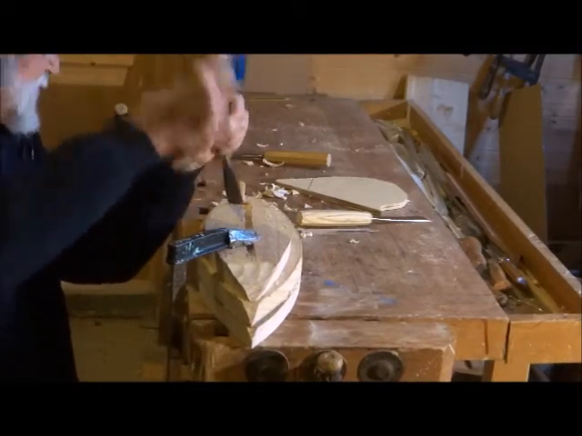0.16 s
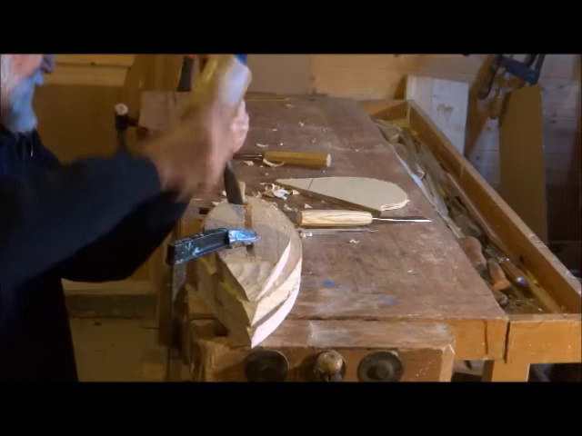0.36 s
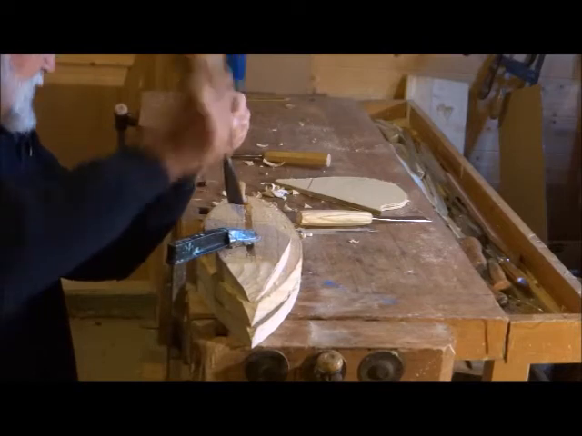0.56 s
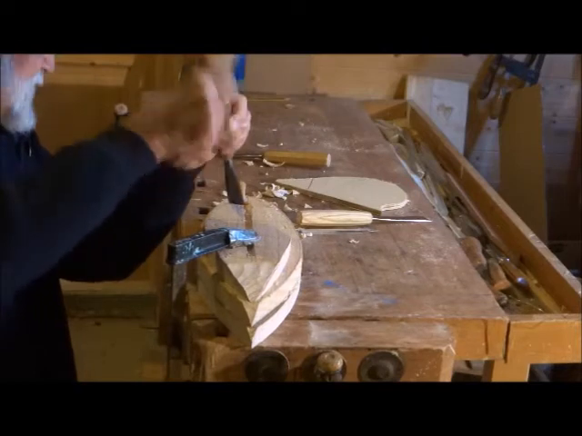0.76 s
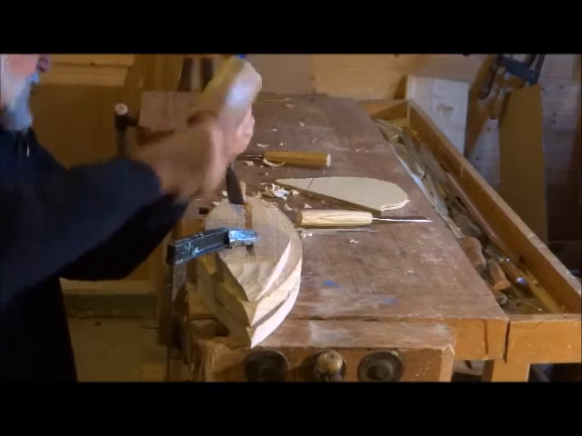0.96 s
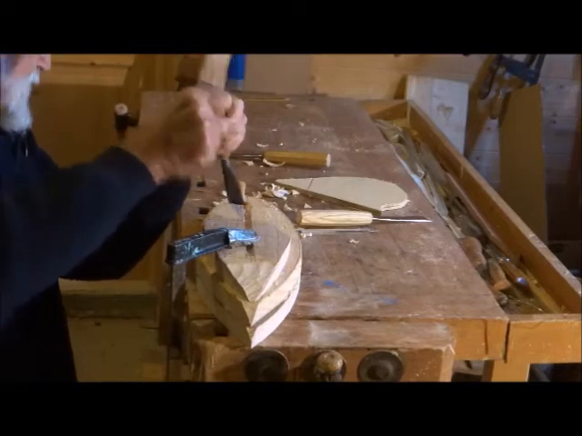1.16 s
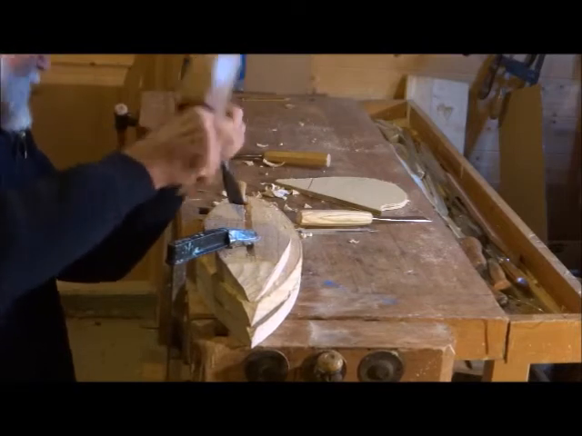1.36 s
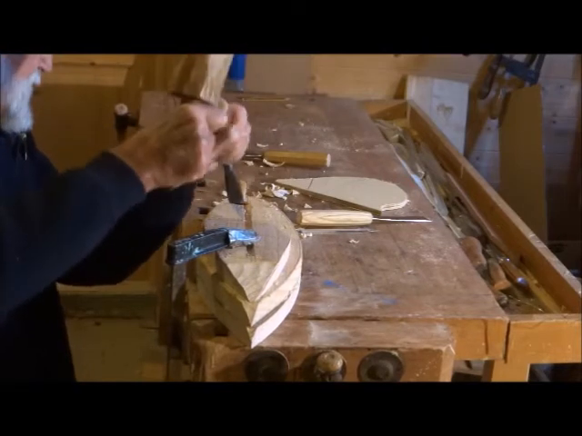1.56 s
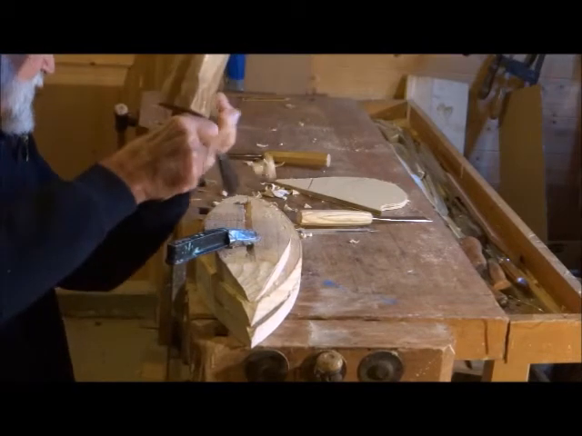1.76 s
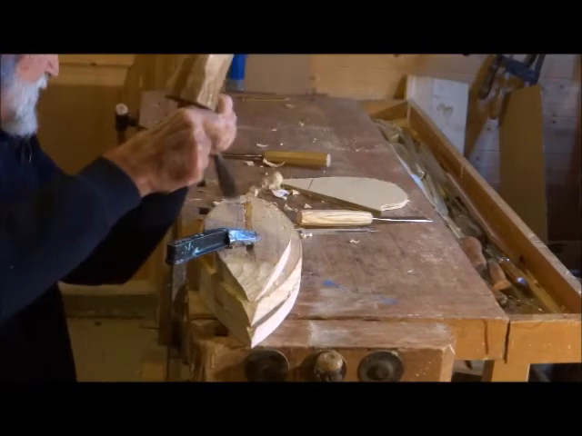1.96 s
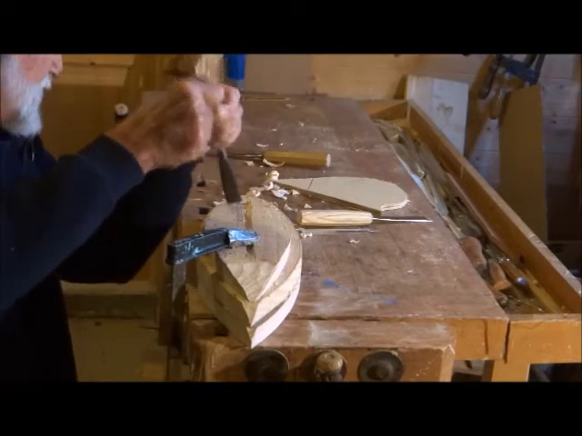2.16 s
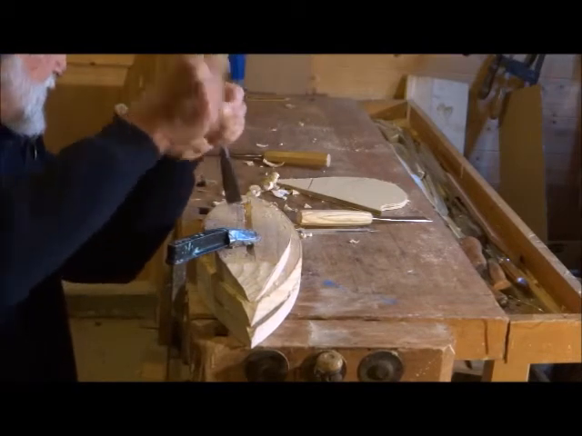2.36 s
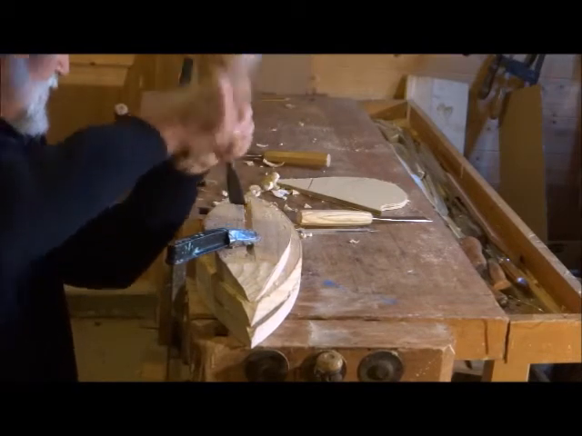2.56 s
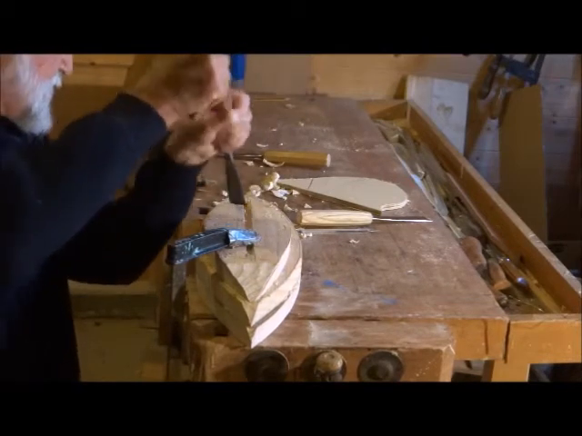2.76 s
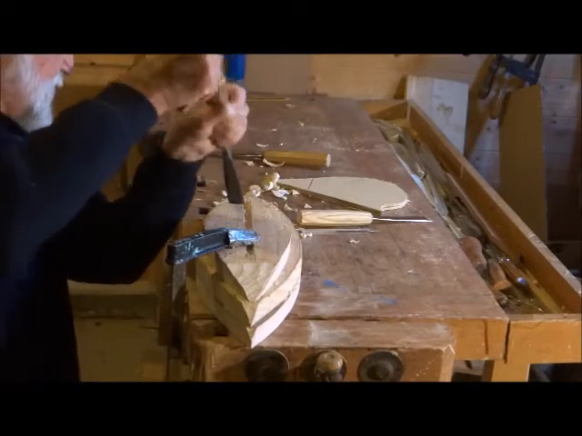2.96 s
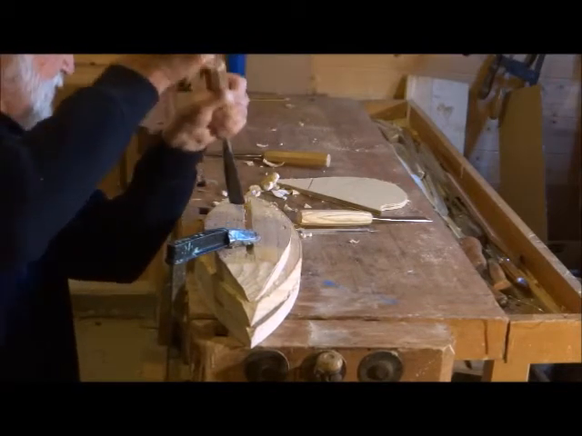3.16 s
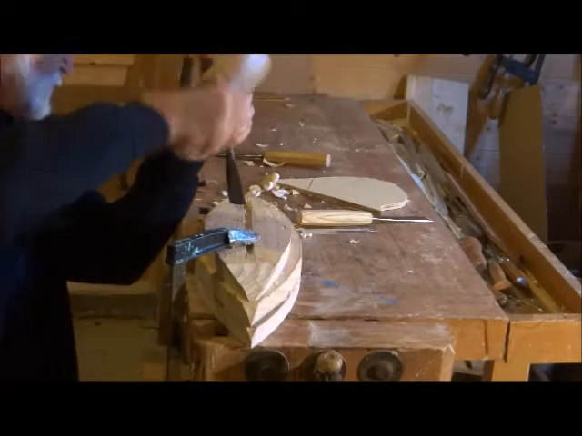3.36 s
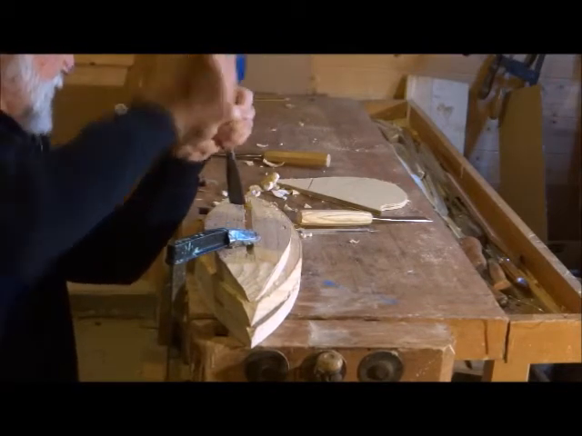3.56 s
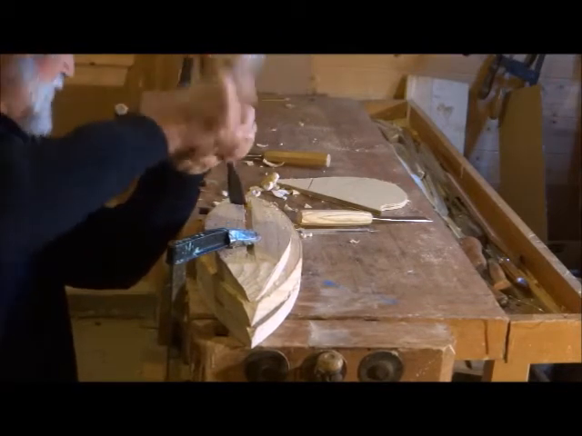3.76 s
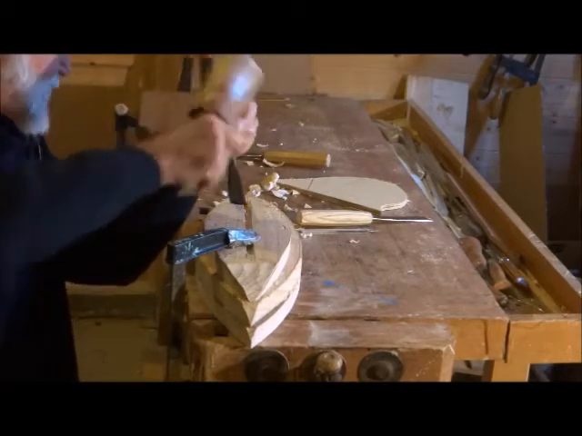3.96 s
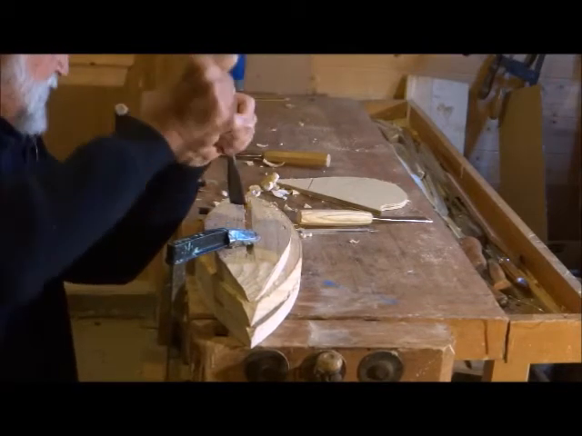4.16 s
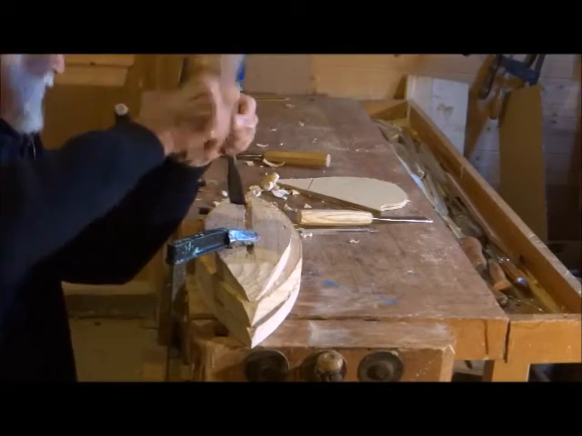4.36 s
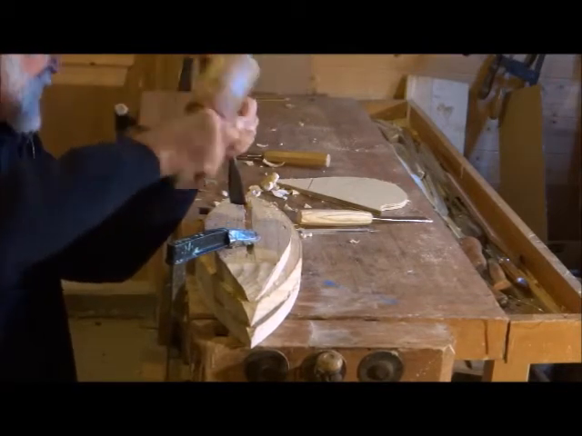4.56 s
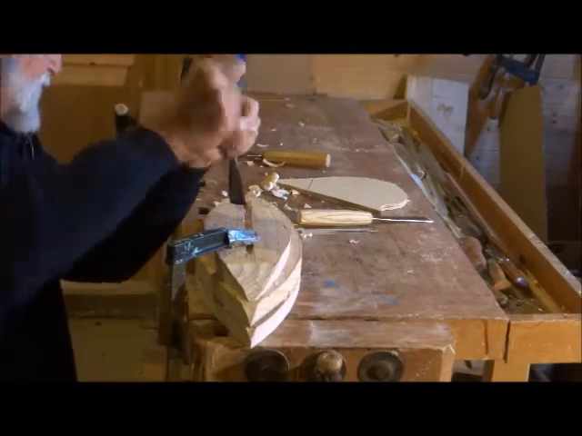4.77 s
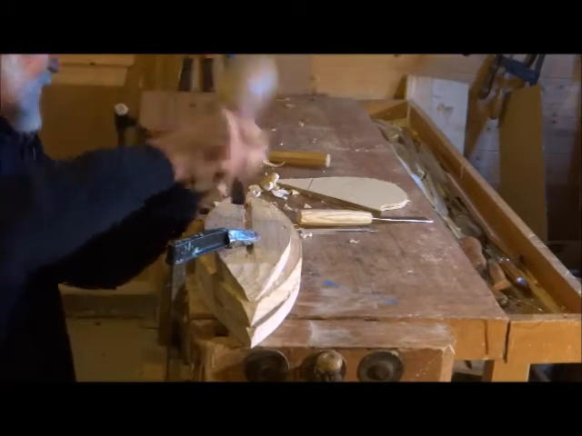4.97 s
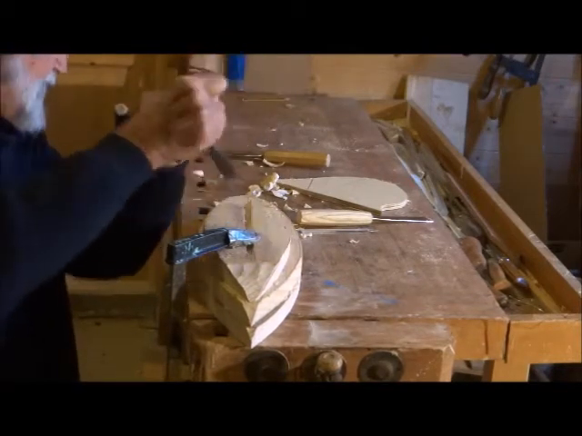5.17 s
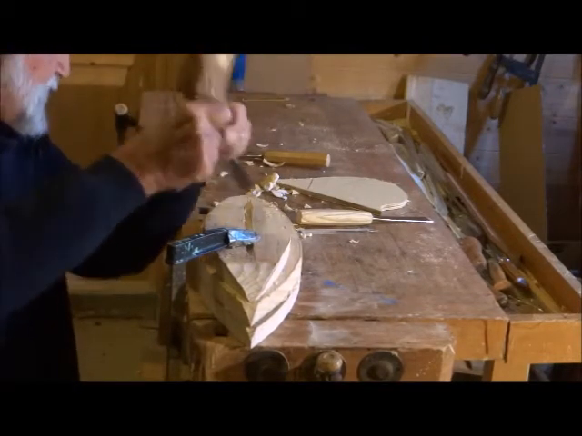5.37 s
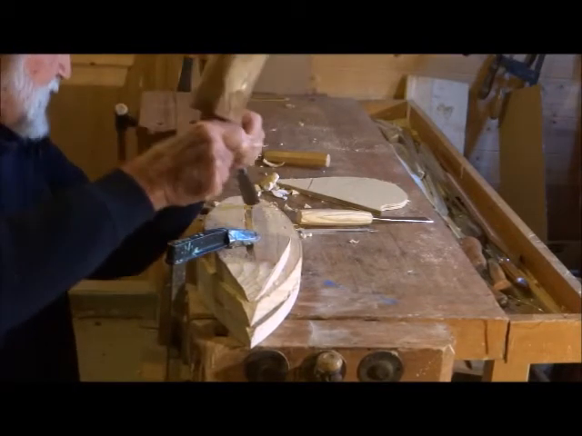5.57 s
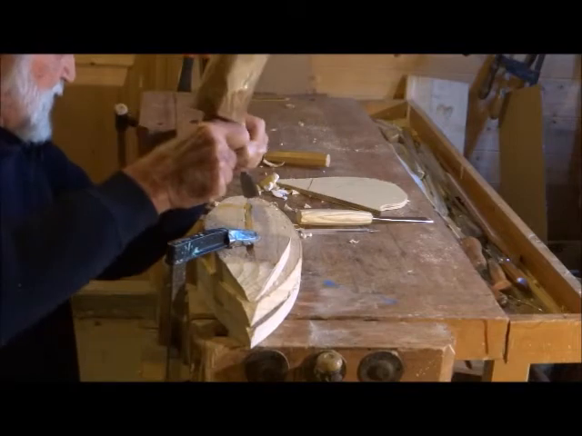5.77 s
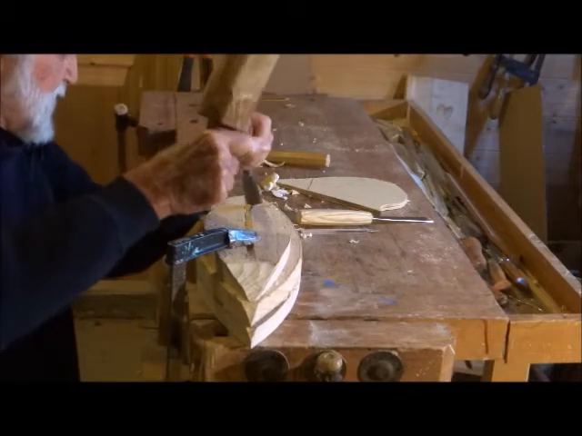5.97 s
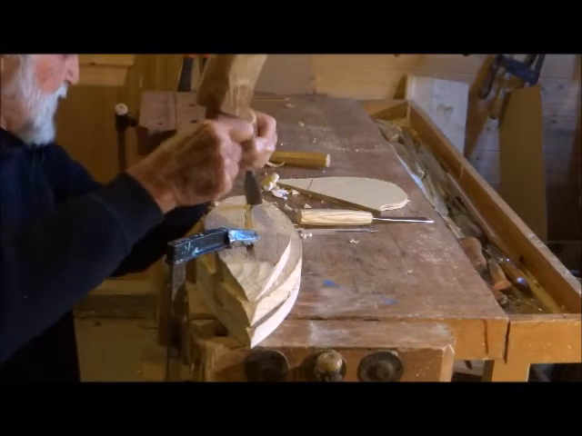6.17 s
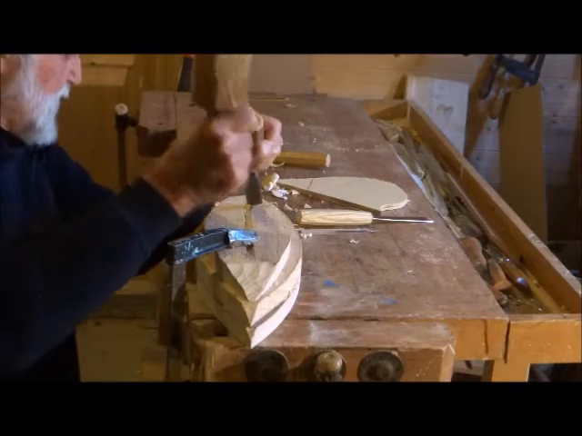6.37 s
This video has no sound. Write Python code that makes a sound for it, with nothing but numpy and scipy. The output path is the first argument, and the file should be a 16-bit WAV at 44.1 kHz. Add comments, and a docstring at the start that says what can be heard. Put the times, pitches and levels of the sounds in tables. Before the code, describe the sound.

Sharp, ringing wooden knocks of a mallet on a chisel, pausing for light bumps and the crack of levered wood.

```python
"""A wooden mallet drives a chisel into a glued block clamped on a workbench: two runs of quick blows
and a few single ones, each a short knock that sets block and bench ringing.
Between them the chisel is levered, fibres crack away and the tools bump lightly.
A small, live workshop echoes over faint room tone; a limiter flattens the start of each blow."""
import sys
import numpy as np
from scipy import signal
from scipy.fft import rfft, irfft
from scipy.io import wavfile
from scipy.ndimage import uniform_filter1d, minimum_filter1d

SR = 44100
rng = np.random.default_rng(int(sys.argv[2]) if len(sys.argv) > 2 else 0)


def bounce(signal):
    """Save signal as a 16-bit WAV file at the path given by the first command-line argument."""
    frames = np.transpose(np.atleast_2d(signal))
    limited = np.clip(frames, -1, 1)
    pcm = np.round(limited * 32767).astype(np.int16)
    wavfile.write(sys.argv[1], SR, pcm)


N = 286650
N_FFT, LEAD = 8192, SR // 20
HZ = np.fft.rfftfreq(N_FFT, 1 / SR)
TIME_S = np.arange(-LEAD, N) / SR  # work is under way at t = 0
RING_S = np.arange(SR * 3 // 4) / SR

# tool bumps on the block: t/s, level/dB
BUMPS = [(1.555, -33.5), (1.978, -21.5), (2.93, -22.5), (5.572, -37.5), (5.603, -42), (5.814, -21)]


def mallet(handle_hz=1520, handle_width_hz=260):
    """One push a blow, coloured by how squarely the mallet lands and how deep the edge sits."""
    # blows: t/s, strength/dB, thud/dB, block f/Hz, handle ring/dB, crack/dB, blade f/Hz
    blows = [(-.012, -.5, -0.5, 1270, -4, 1.5, 4300), (.295, -1, -1.5, 1350, -5, 1.5, 7600),
             (.596, -3, -0.5, 1405, -3.5, 4.5, 7750), (.907, -3, -1, 753, 3, 1.5, 4460),
             (1.227, -2, -1, 814, 0, -3, 2980), (2.414, -8, -7, 300, 8.5, -1, 5460),
             (3.295, -3, -0.5, 540, 4.5, 1.5, 2430), (3.6153, -1.5, -3, 440, 4.5, 0, 7350),
             (3.9264, 0.5, -2, 974, -0.5, -1.5, 6100), (4.231, 1, -1.5, 1046, -3, -3.5, 7700),
             (4.534, -2, -.5, 697, 0.5, 0, 4300), (4.832, -1.5, 1, 380, 4, 1.5, 3380),
             (6.45, -11, 1, 1230, 2, 0, 7000)]
    # centres of thud, knock, crack and snap: f/Hz
    bands_hz = [380, 950, 2900, 7800]
    pushes = np.zeros(len(TIME_S))
    for start_s, strength_db, thud_db, block_hz, handle_db, crack_db, blade_hz in blows:
        snap_db = 0.54 * crack_db - 1
        tilt_db = spectrum(list(zip(bands_hz, [thud_db, 0, crack_db, snap_db])))
        lift_db = bells([(block_hz, 0.3 * block_hz, 5),
                         (handle_hz, handle_width_hz, handle_db),
                         (blade_hz, 0.065 * blade_hz, 5)])
        add(pushes, start_s, through(contact(), pulse(strength_db + tilt_db + lift_db)))
    return pushes


def contact(corner_hz=3000, crush_s=0.0027, crush_db=-2):
    """A smooth push, then a splintery crush of fibres under the edge that carries the treble."""
    t = RING_S[:N_FFT]
    low_power = 1 / (1 + (HZ / corner_hz) ** 6)
    push = pulse(10 * np.log10(low_power))
    splinters = unit(spiky_noise(N_FFT, spread_db=3) * np.exp(-t / crush_s))
    crush = through(splinters, pulse(crush_db + 10 * np.log10(1 - low_power + 1e-9)))
    return whiten(push + crush, bins=31)


def chisel(pushes):
    """Short wood-on-wood knock with the hand-damped resonances of handle and blade."""
    # knock of mallet, chisel and block: f/Hz, level/dB
    knock = [(25, -36), (60, -38), (90, -24), (140, -19), (200, -13.5), (280, -4), (750, -3), (1150, -3),
             (1750, -3.5), (2500, -4), (3200, -10), (6800, -20), (9300, -20.5), (11000, -34.5)]
    # hand-held chisel: f/Hz, width/Hz, lift/dB
    resonances = [(1568, 140, 5), (4300, 230, 4), (5450, 140, 4.5), (6350, 45, 6), (7950, 750, 5.5)]
    return through(pushes, unit(pulse(spectrum(knock) + bells(resonances))))


def bench(pushes, build_cycles=4.1):
    """Modes take a few cycles to build, so the low ones swell after the knock."""
    # block, bench and surrounding space: f/Hz, level/dB, T60/s
    modes = [(115.5, -41, 0.23), (199.5, -27, 0.22), (260.7, -22.5, 0.3), (280.1, -19, 0.34),
             (301.6, -13, 0.32), (412, -17.5, 0.34), (428, -15.5, 0.35), (451.4, -15, .32),
             (483, -13, 0.24), (505.5, -13.5, 0.27), (566, -19.5, 0.27), (622, -17, 0.27),
             (696, -17.5, 0.25), (935, -16.5, 0.2), (1101, -18.5, 0.32), (1134, -15.5, 0.24),
             (1193, -16, 0.29), (1306, -20, 0.28), (1496, -18, .3), (1517, -19, 0.21), (1545, -15.5, .3),
             (1573, -17.5, .3), (1670, -29, 0.25), (1984, -16, 0.25), (2530, -18, 0.19)]
    t = RING_S
    ring = np.zeros(len(t))
    for hz, db, t60_s in modes:
        envelope = (1 - np.exp(-t * hz / build_cycles)) * gain_of(-60 * t / t60_s)
        ring += gain_of(db) * unit(envelope * np.sin(2 * np.pi * (hz * t + rng.random())))
    return through(pushes, ring)


def fibres(highpass_hz=200, rub_db=-11, rub_s=0.012):
    """Fibres crack under the levered chisel and rub faintly at each bump."""
    # breaks: t/s, level/dB, length/s, tilt/(dB/octave)
    cracks = [(1.555, -6.5, 0.0029, 6.5), (1.72, -32, 0.0081, 5), (1.82, -16, 0.003, 0),
              (1.93, -22.5, .02, 15), (1.975, -23.5, .014, 2), (2.592, -22.5, .007, 4),
              (2.751, -24, 0.019, 7.5), (2.928, -18.5, .03, 4), (3.046, 6.5, 0.012, 0.44),
              (4.949, -11.5, 0.012, 5), (5.117, -9, .026, -4), (6.289, -28, 0.021, -0.5)]
    rubs = [(start_s, db + rub_db, rub_s, 0) for start_s, db in BUMPS]
    out = np.zeros(len(TIME_S))
    for start_s, db, length_s, db_per_octave in [*cracks, *rubs]:
        add(out, start_s - LEAD / SR, gain_of(db) * crack(length_s, db_per_octave))
    return signal.sosfilt(signal.butter(2, highpass_hz, "high", fs=SR, output="sos"), out)


def crack(length_s, db_per_octave, strain_db=-11.5):
    """Tiny uneven snaps grow under strain; the fibres break LEAD samples in."""
    # fibre snap: f/Hz, level/dB
    colour = [(100, -33.5), (300, -14), (550, -0.5), (2200, 1), (5000, 0), (9000, -1.5), (11000, -16.5)]
    # narrow peaks colouring the fibre cracks: f/Hz, width/Hz, lift/dB
    crack_peaks = [(3360, 130, 3.5), (3710, 150, 6.5), (1100, 110, 2.5)]
    t = TIME_S[:N_FFT]
    strain = gain_of(strain_db) * np.exp(-abs(t) / length_s) * (t < length_s)
    breaking = np.sin(np.pi * np.clip(t / length_s, 0, 1))
    clump = whiten(spiky_noise(N_FFT, spread_db=7) * np.maximum(strain, breaking), bins=15)
    tilt_db = db_per_octave * np.log2(HZ / 3000 + 0.1)
    return unit(through(clump, pulse(spectrum(colour) + bells(crack_peaks) + tilt_db)))


def bumps(firm_db=-25, firm_hz=800, db_per_octave=13, highpass_hz=260):
    """Tools tap the block; the softer, the duller."""
    # tap resonances: f/Hz, width/Hz, lift/dB
    resonances = [(320, 90, 5), (1070, 230, 10)]
    highpass_db = -10 * np.log10(1 + (highpass_hz / (HZ + 1)) ** 6)
    out = np.zeros(len(TIME_S))
    for start_s, db in BUMPS:
        corner_hz = firm_hz * 2 ** ((db - firm_db) / db_per_octave)
        lowpass_db = -16 * np.log10(1 + (HZ / corner_hz) ** 3)
        add(out, start_s, gain_of(db) * unit(pulse(lowpass_db + highpass_db + bells(resonances))))
    return out


def workshop(x, sway_rad_per_s=1.886):
    """Direct sound plus echoes whose pattern shifts as the worker moves."""
    # direct path against echoes: f/Hz, level/dB
    direct = [(200, -19), (600, -23), (1400, -2.5), (2500, -5), (4500, -15), (10000, -11.5)]
    # side against mid echoes: f/Hz, level/dB
    width = [(60, -17), (250, -20), (600, -15.5), (1400, -12), (3000, -11), (9000, -9.5)]
    paths = [x * np.cos(sway_rad_per_s * TIME_S), x * np.sin(sway_rad_per_s * TIME_S)]
    mid_echoes = sum(through(path, reflections()) for path in paths)
    side_echoes = sum(through(path, reflections()) for path in paths)
    mid = through(x, pulse(spectrum(direct))) + mid_echoes
    side = through(side_echoes, pulse(spectrum(width)))
    return np.array([mid + side, mid - side])


def reflections(walls_s=0.0053, bench_top_db=-7):
    """Weak early echoes off the bench top, then walls and ceiling, decaying by band."""
    # room decay: f/Hz, T60/s
    decay = [(100, 0.47), (260, 0.28), (700, 0.31), (1800, 0.28), (4800, 0.27), (10000, 0.24)]
    hz, t, noise = signal.stft(rng.standard_normal(len(RING_S)), SR, nperseg=256)
    t60_s = np.interp(hz, HZ, spectrum(decay))[:, None]
    _, tail = signal.istft(noise * gain_of(-60 * t / t60_s), SR, nperseg=256)
    onset = np.where(RING_S > walls_s, 1, gain_of(bench_top_db))
    return whiten(tail[:len(RING_S)] * onset, bins=15)


def room_tone(mid_db=-64.5, side_re_mid_db=-6):
    """Steady faint noise, partly alike in both ears."""
    # room tone and hiss: f/Hz, level/dB
    floor = [(25, -37.5), (90, -17), (160, -7.5), (280, -4.5), (400, -4.5), (530, -1.5), (750, -6),
             (1000, -6), (1250, -8), (2800, -11.5), (5500, -18.5), (9500, -16.5), (11000, -26.5)]
    # faint tones: f/Hz, width/Hz, lift/dB
    hum = [(269.7, 26, 9.5), (1030, 11, 12.5)]
    colour = gain_of(mid_db) * unit(pulse(spectrum(floor) + bells(hum)))
    mid, side = (through(rng.standard_normal(len(TIME_S)), colour) for _ in range(2))
    side *= gain_of(side_re_mid_db)
    return np.array([mid + side, mid - side])


def gain_of(db):
    """dB to amplitude."""
    return 10 ** (np.asarray(db) / 20)


def unit(x):
    """Scale to unit energy."""
    return x / np.linalg.norm(x)


def spectrum(points):
    """Rows of (f/Hz, value) interpolated onto HZ in log frequency."""
    hz, value = np.transpose(points)
    return np.interp(np.log(HZ + 1), np.log(hz), value)


def bells(resonances):
    """Rows of (f/Hz, width/Hz, lift/dB) summed on HZ, in dB."""
    return sum(db / (1 + (2 * (HZ - hz) / width_hz) ** 2) for hz, width_hz, db in resonances)


def pulse(db):
    """Minimum-phase pulse with this spectrum."""
    log_gain = np.log(gain_of(np.maximum(db, -100)))
    mirrored = np.r_[log_gain, log_gain[-2:0:-1]]
    return irfft(np.exp(np.conj(signal.hilbert(mirrored)))[:len(HZ)])


def spiky_noise(samples, spread_db):
    """Noise with a log-normal gain on each sample."""
    return rng.standard_normal(samples) * gain_of(spread_db * rng.standard_normal(samples))


def whiten(noise, bins):
    """Flatten the spectrum of a short noise; unit energy."""
    power = uniform_filter1d(abs(rfft(noise, N_FFT)) ** 2, size=bins)
    return unit(through(noise, pulse(-10 * np.log10(abs(power) + 1e-12))))


def through(x, response):
    """Convolve, keeping the length of x."""
    return signal.fftconvolve(x, response)[:len(x)]


def add(mix, start_s, sound):
    """Mix a sound in at start_s on TIME_S."""
    part = mix[LEAD + round(start_s * SR):][:len(sound)]
    part += sound[:len(part)]


def scene(knock_db=25, ring_db=25, bump_ring_db=-3):
    """Blows, cracks and bumps in the workshop; blows and bumps also ring the bench."""
    pushes, taps = mallet(), bumps()
    near = gain_of(knock_db) * chisel(pushes) + fibres() + taps
    ringing = bench(gain_of(ring_db) * pushes + gain_of(bump_ring_db) * taps)
    return (workshop(near) + ringing + room_tone())[:, LEAD:]


def record(dry, threshold_db=-14.0, slope=0.81, release_db_per_s=280, lowpass_hz=11150):
    """Fast limiter on the blows, then a steep low-pass."""
    power = uniform_filter1d((dry ** 2).mean(0), size=40)
    level_db = 10 * np.log10(abs(power) + 1e-12)
    fall_db = release_db_per_s * TIME_S[LEAD:]
    held_db = np.maximum.accumulate(level_db + fall_db) - fall_db
    over_db = np.maximum(held_db - threshold_db, 0)
    duck_db = slope * uniform_filter1d(minimum_filter1d(-over_db, size=45), size=45)
    lowpass = signal.firwin(401, lowpass_hz, window=("kaiser", 8), fs=SR)
    return signal.oaconvolve(dry * gain_of(duck_db), lowpass[None], "same")


dry = scene()
out = record(dry)
bounce(out)
```